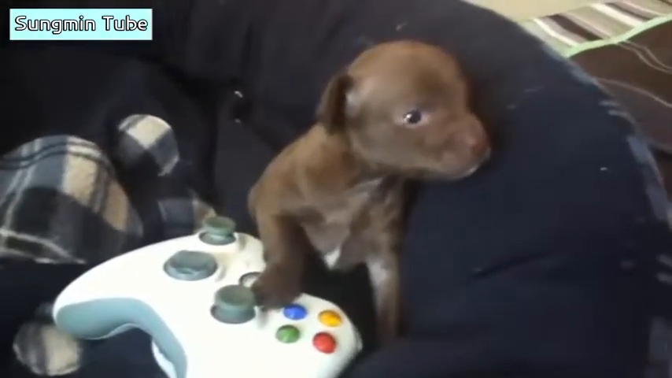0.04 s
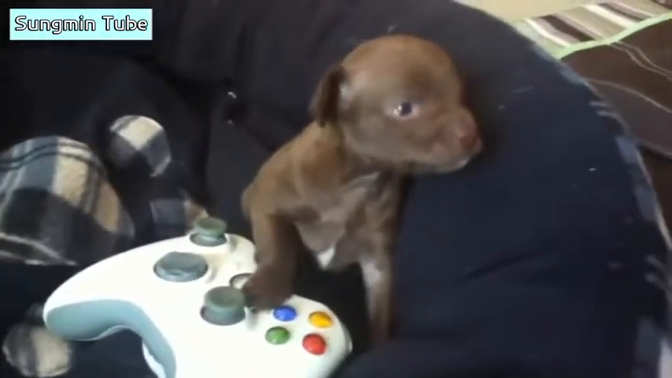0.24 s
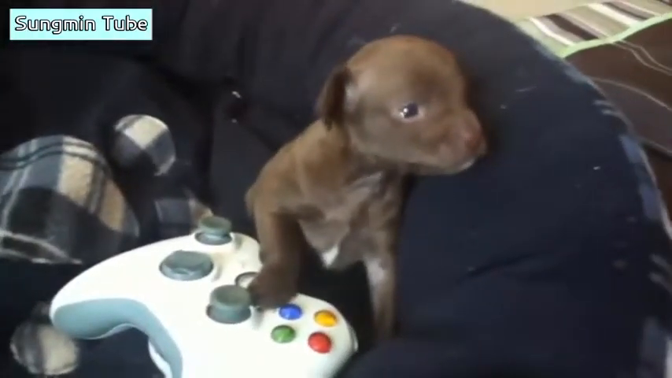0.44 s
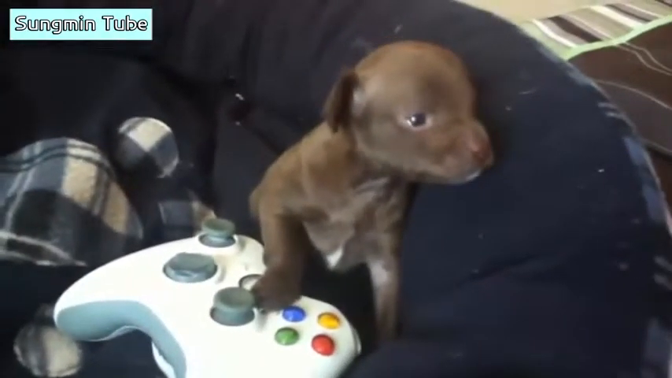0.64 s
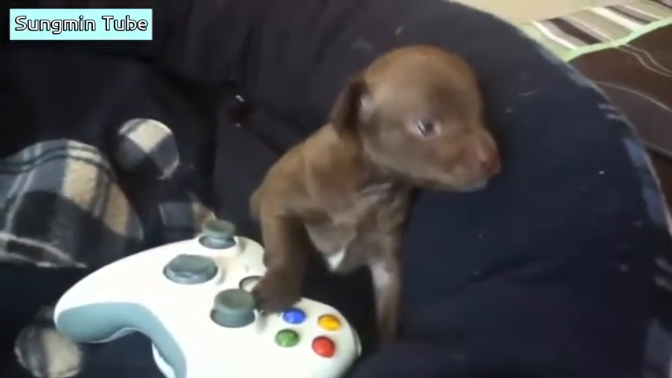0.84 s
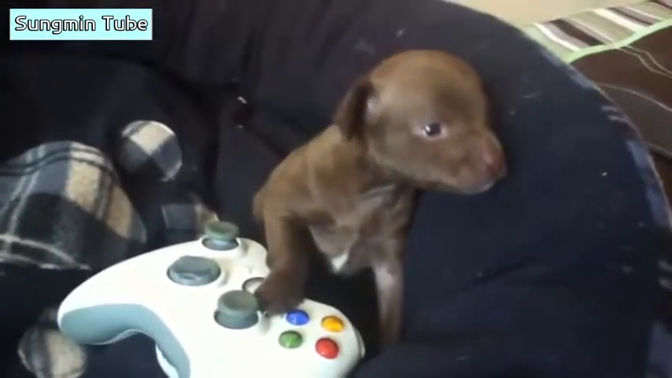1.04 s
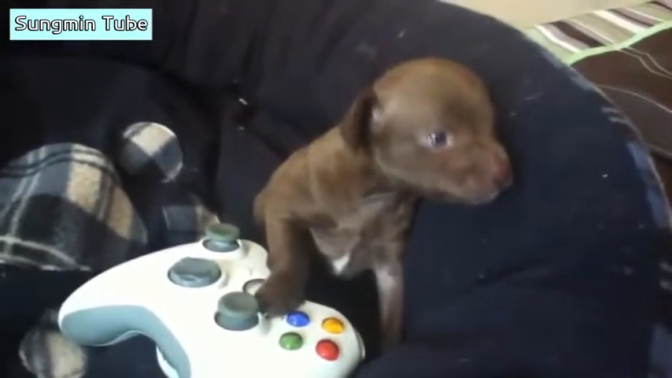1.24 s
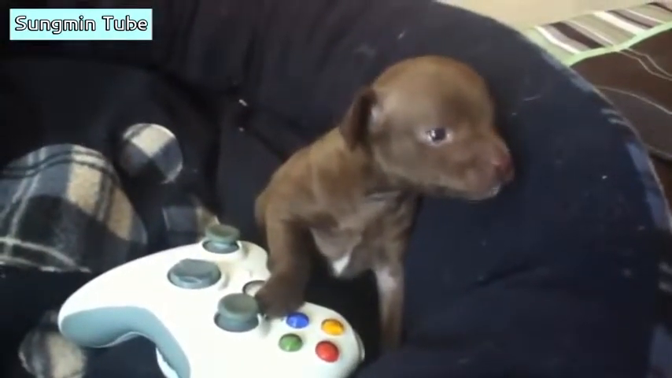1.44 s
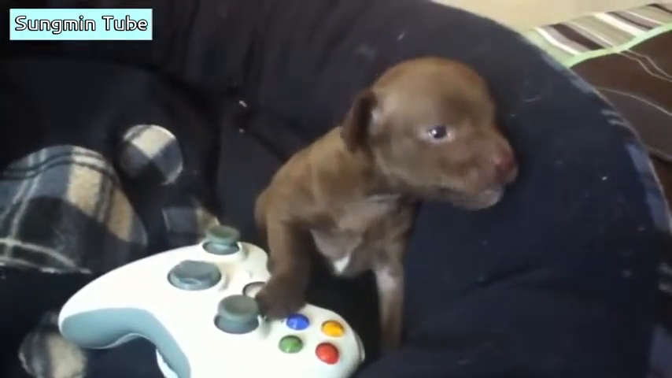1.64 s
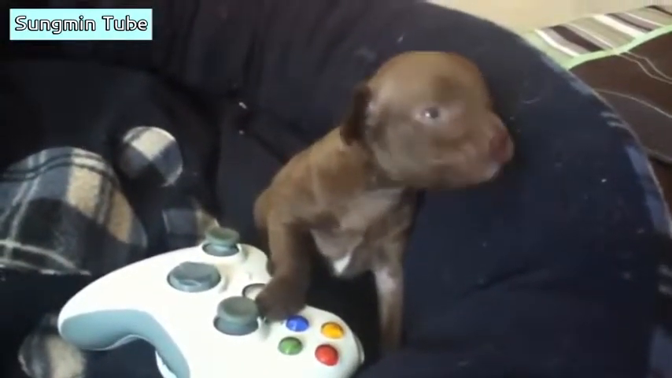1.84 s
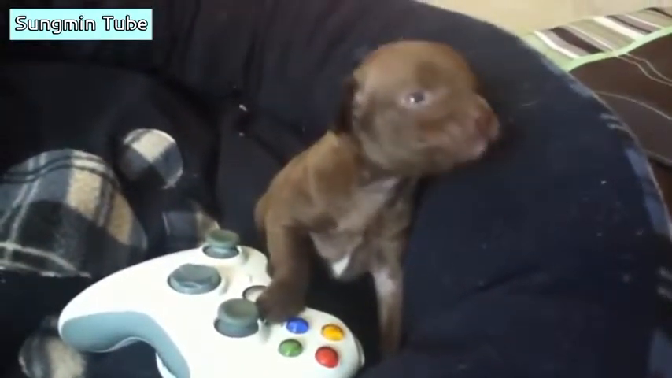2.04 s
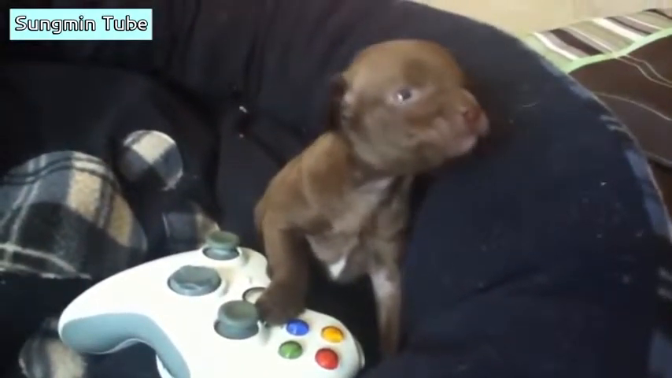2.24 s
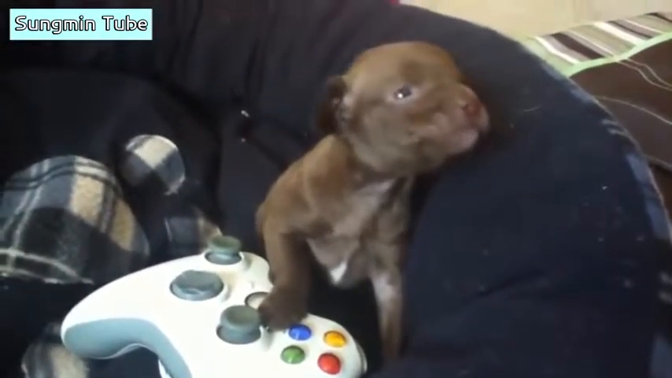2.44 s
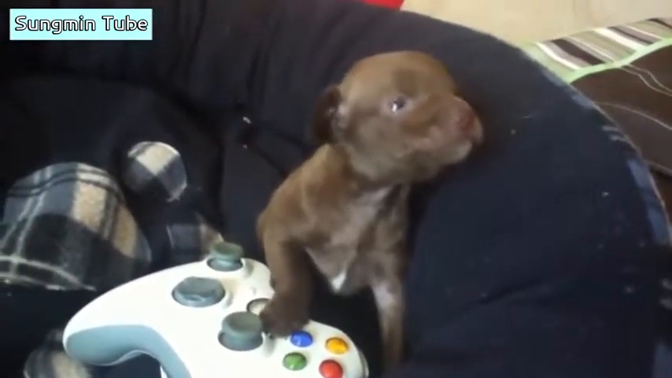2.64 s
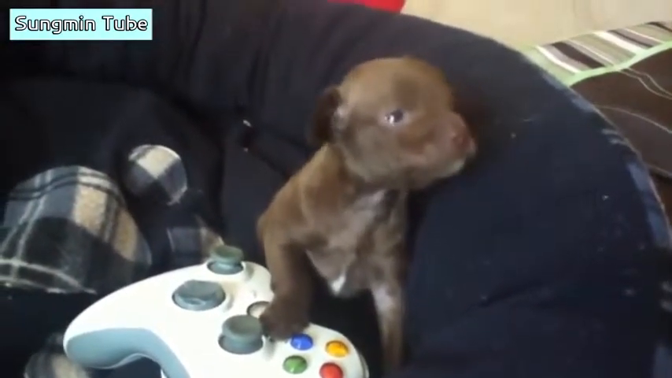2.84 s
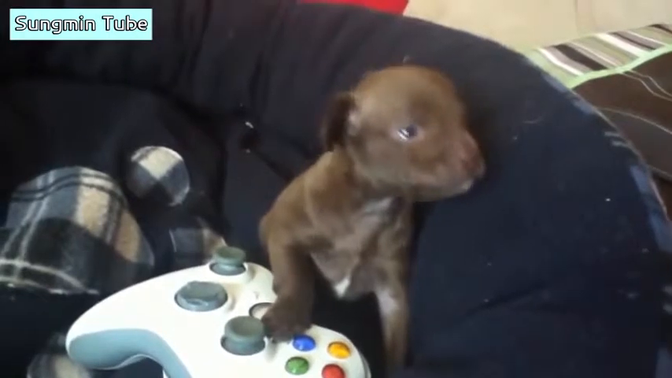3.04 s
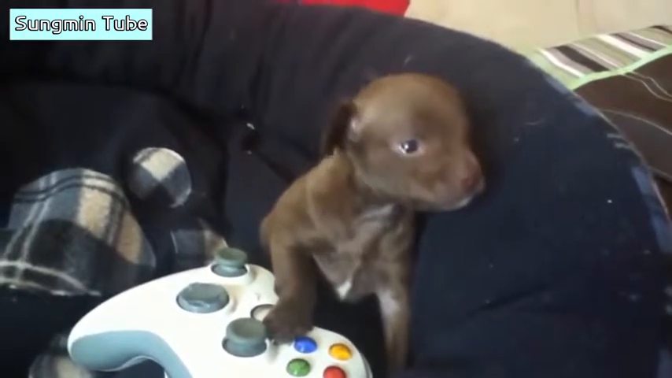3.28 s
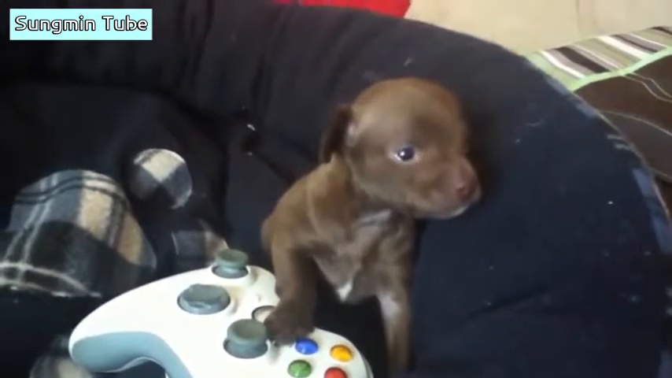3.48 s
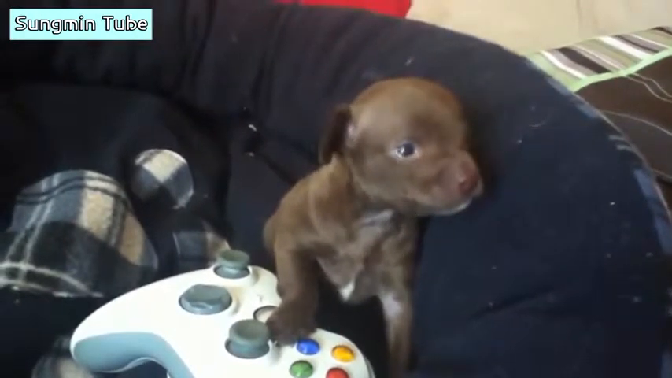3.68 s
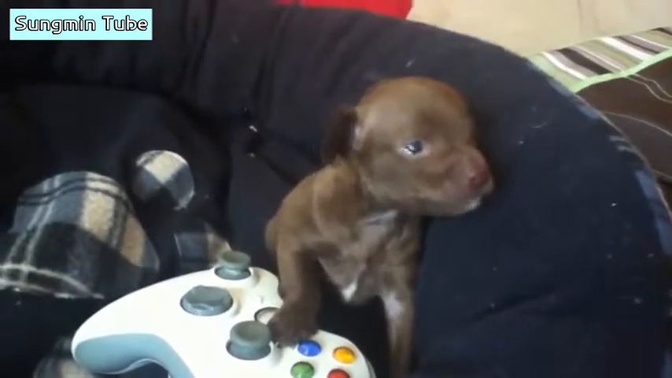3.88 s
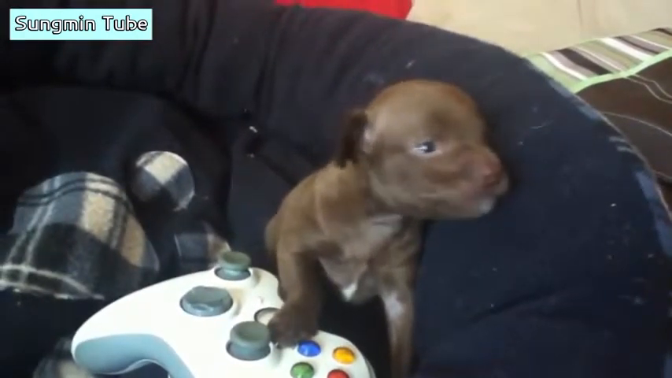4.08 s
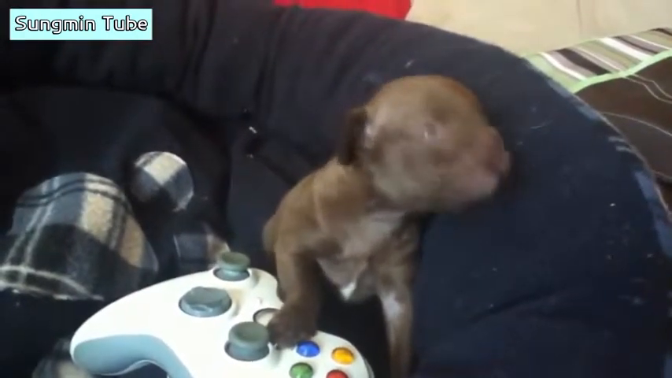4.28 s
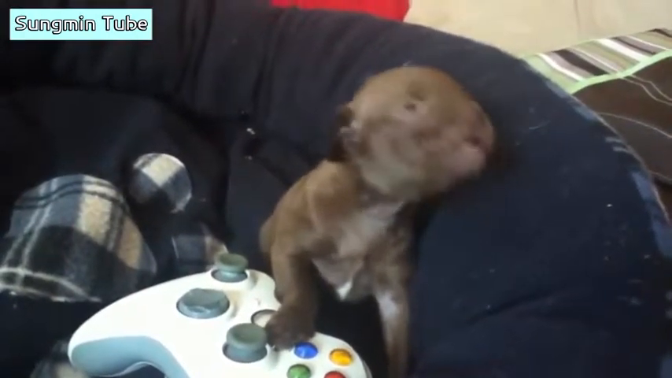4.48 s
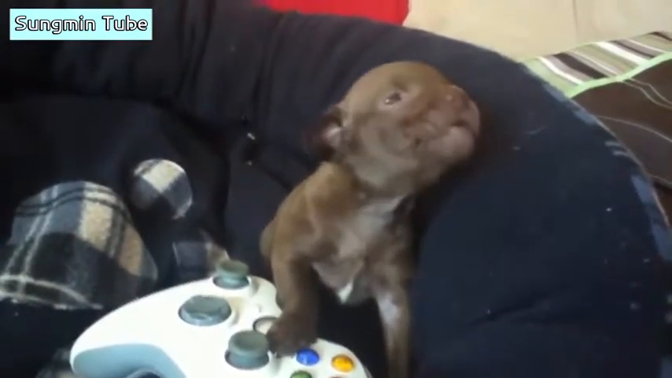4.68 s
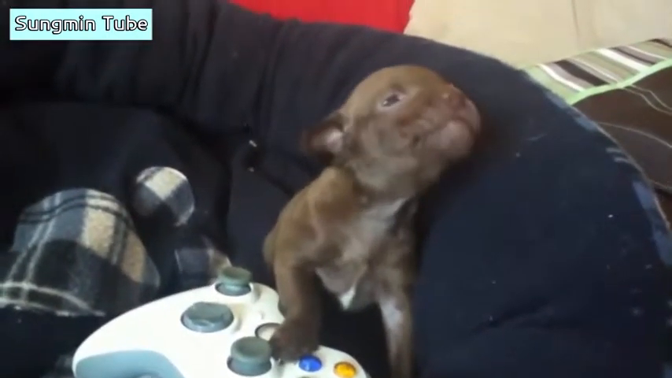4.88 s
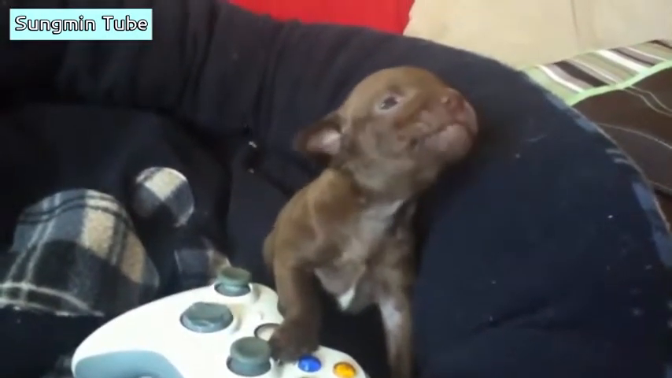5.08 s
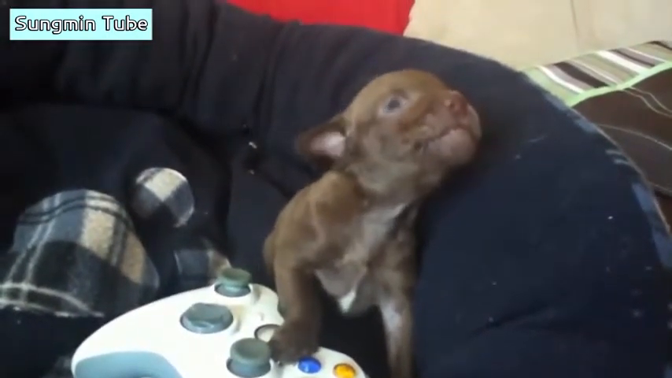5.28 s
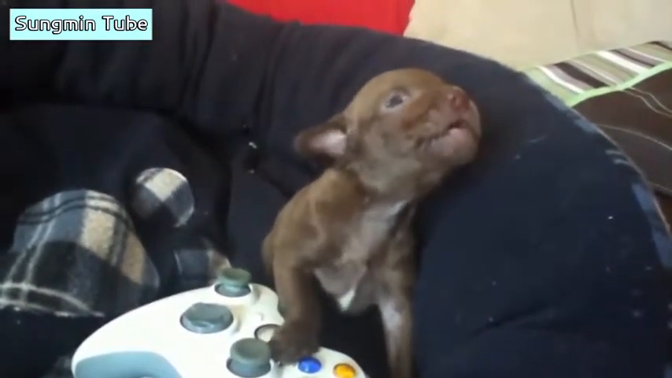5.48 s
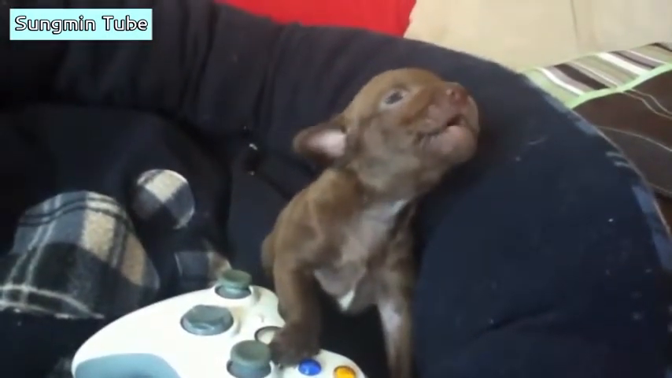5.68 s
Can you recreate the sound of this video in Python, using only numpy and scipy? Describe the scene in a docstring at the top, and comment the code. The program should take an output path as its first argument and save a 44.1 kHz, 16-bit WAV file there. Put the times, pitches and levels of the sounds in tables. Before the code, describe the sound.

A small puppy gives short whimpering grunts, one harsh yelp, then a high arching howl, close by in a quiet room.

```python
"""Puppy whimpering and howling

A small puppy, close by in a quiet room, whimpers in short closed-mouth grunts, gives one harsh yelp,
then a long arching howl and the start of another. Its vocal folds drive throat and mouth, and air
rushing through them adds rasp and hiss. The voice cracks at set moments, mostly near the flips
between its low chest register and its high head register."""
import sys
import numpy as np
from scipy import signal
from scipy.fft import rfft, irfft
from scipy.io import wavfile
from scipy.ndimage import uniform_filter1d, minimum_filter1d

SR = 44100
rng = np.random.default_rng(int(sys.argv[2]) if len(sys.argv) > 2 else 0)


def file_out(sig):
    """Save sig as 16-bit WAV at sys.argv[1]."""
    # one column per channel
    cols = np.atleast_2d(sig).T
    # limit, then scale
    lim = np.clip(cols, -1, 1)
    pcm = np.round(lim * 32767).astype(np.int16)
    wavfile.write(sys.argv[1], SR, pcm)


N = 252246
TIME = np.arange(N) / SR
SLACK_HZ, CUTOFF_HZ = 200, 15450  # pitch of slack folds; upper band edge


def vocal_folds(pitch_hz, head, rough, overtones_db, waver_db=2.0):
    """Folds drive the throat; with rising roughness their cycles alternate, then turn chaotic."""
    # throat gain on the overtones, per register: (frequency [Hz], gain [dB])
    chest_gains = [(600, -4.5), (900, -5.5), (1200, -13.5), (1450, -19), (1780, -24), (2080, -14),
                   (2350, -22.5), (2650, -37.5), (3200, -34.5), (4000, -46), (6300, -58), (8200, -55),
                   (10500, -64), (12800, -65)]
    head_gains = [(1400, -2.5), (1900, -9.5), (2400, -16.5), (2900, -30), (3450, -30), (3850, -42.5),
                  (4700, -38.5), (6400, -60), (7400, -43), (8100, -33), (10000, -38.5), (12000, -44.5),
                  (15000, -80)]
    size = len(pitch_hz)
    unevenness = 0.012 * (1 - head) + 0.113 * rough  # slack folds beat less evenly
    jitter = 0.0053 * flutter(53, size) + unevenness * flutter(600, size)
    phase = 2 * np.pi * np.cumsum(pitch_hz * (1 + jitter)) / SR
    overtones = np.zeros(size)
    for k in range(2, int(CUTOFF_HZ / pitch_hz.min())):
        hz = k * pitch_hz
        throat = gain_at(chest_gains, hz) ** (1 - head) * gain_at(head_gains, hz) ** head
        waver = from_db(waver_db * (1 - 2 / k) * flutter(42, size))
        overtones += throat * waver * (hz < CUTOFF_HZ) * np.cos(k * phase - np.sqrt(k - 1) * np.pi / 2)
    tone = np.cos(phase) + from_db(overtones_db) * overtones
    # alternating strong and weak cycles put lines between the lowest harmonics
    alternation = np.clip((rough - .12) / 0.46, 0, 1) * (1 - 0.73 * head)
    tone += alternation * (np.cos(1.5 * phase) + 0.54 * np.cos(2.5 * phase))
    shimmer = 1 + 0.49 * rough * flutter(270, size)
    clarity = 1 - 0.16 * rough ** 2
    return np.sqrt(2) * tone * shimmer * clarity, phase


def voice(pitch_hz, level_db, overtones_db, treble_db, rough, break_hz=690):
    """Fold tone and turbulent air, pulsed as the folds open, leave the mouth with a hiss."""
    # turbulence in throat and mouth; escaping air: (frequency [Hz], relative density [dB])
    rasp_spectrum = [(350, -62), (600, -25), (850, -4.5), (1250, -2.5), (1800, -7.5), (2500, -12),
                     (3000, -16), (3800, -23.5), (4700, -26), (6500, -45), (8000, -27), (10500, -77),
                     (13000, -41), (16000, -56)]
    hiss_spectrum = [(2500, -30), (4700, -4), (6600, -14), (8200, 2.5), (10500, -9), (13000, 4),
                     (14500, -19), (16000, -18)]
    size = len(pitch_hz)
    head = np.clip((pitch_hz - break_hz) / 140 + .5, 0, 1)  # register: 0 chest, 1 head
    tone, phase = vocal_folds(pitch_hz, head, rough, overtones_db)
    air = noise(lambda hz: gain_at(rasp_spectrum, hz), size) * (1 + 0.45 * np.cos(phase))
    leak = from_db(-38) + from_db(-27) * (1 - head)  # slack folds never close fully
    rasp = from_db(-3) * rough ** 1.56
    sound = tone + (leak + rasp) * air
    sound /= np.sqrt(uniform_filter1d(sound ** 2, size=600))  # unit rms: the push sets loudness
    hiss = from_db(-36.5) * (1 - 0.64 * head) * noise(lambda hz: gain_at(hiss_spectrum, hz), size)
    push = from_db(level_db)
    return mouth(push * sound, pitch_hz, treble_db) + push * hiss


def mouth(x, pitch_hz, treble_db):
    """Lips pass more or less treble and little bass; a gape on top notes adds a piercing resonance."""
    gape = np.clip((pitch_hz - 980) / 180, 0, 1)
    resonance = from_db(8) * signal.sosfilt(bandpass(centre_hz=3820, width_hz=560), gape * x)
    treble = signal.sosfiltfilt(signal.butter(6, 2850, "high", fs=SR, output="sos"), x)
    x = x + resonance + (from_db(treble_db) - 1) * treble
    return signal.sosfilt(signal.butter(3, 210, "high", fs=SR, output="sos"), x)


def call(on, pitch_hz, level_db, bloom_s=0.01, crack_edge_s=0.0059, edge_s=0.0025):
    """One call over the mask `on`: colour follows pitch; slack or cracking folds are rough."""
    # the mouth opens on higher notes: (pitch [Hz], overtone gain [dB], treble gain [dB])
    colours = [(288, -13, 3), (353, -4, -6), (505, -1, 0.5), (579, 5, -2), (650, 8.5, -2.5), (760, -3, -3),
               (840, 0.5, 0), (897, 1, -1), (940, 5, -4), (1170, 6.5, -10)]
    # voice cracks: (start [s], length [s], added roughness [0-1])
    cracks = [(1.414, 0.0049, 0.48), (1.616, .03, 0.25), (1.862, 0.0552, 0.73), (1.94, 0.0206, 0.71),
              (4.382, 0.015, 0.48), (4.446, 0.0597, 0.32), (5.075, 0.0092, 0.28)]
    t, out = TIME[on], np.zeros(N)
    knots_hz, *columns = np.transpose(colours)
    overtones_db, treble_db = [np.interp(pitch_hz, knots_hz, column) for column in columns]
    overtones_db -= 2 * np.exp(-(t - t[0]) / bloom_s)
    rough = 0.22 * (SLACK_HZ / pitch_hz) ** 2
    for start_s, length_s, depth in cracks:
        inside_s = np.minimum(t - start_s, start_s + length_s - t)
        rough += depth * np.clip(inside_s / crack_edge_s + .5, 0, 1)
    edge = np.clip(np.minimum(t - t[0], t[-1] - t) / edge_s, 0, 1)
    fade = np.sin(edge * np.pi / 2) ** 2
    out[on] = fade * voice(pitch_hz, level_db, overtones_db, treble_db, np.clip(rough, 0, 1))
    return out


def cry(contour):
    """A sustained call along a contour of pitch and level."""
    times_s, pitch_hz, level_db = np.transpose(contour)
    on = (TIME >= times_s[0]) & (TIME <= times_s[-1])
    return call(on, np.interp(TIME[on], times_s, pitch_hz), np.interp(TIME[on], times_s, level_db))


def howls():
    """A howl climbs into head register and arches, a treble band flaring twice; a second begins."""
    # voice contours: (time [s], pitch [Hz], level [dB])
    climb = [(4.289, 348, -26.5), (4.309, 408, -22.5), (4.341, 512, -16), (4.381, 597, -19),
             (4.391, 769, -16), (4.419, 796, -15.5), (4.435, 654, -19), (4.459, 592.4, -17.5),
             (4.487, 661, -17)]
    arch = [(4.5, 810, -15.5), (4.508, 805, -12.5), (4.518, 851, -13), (4.566, 902, -13),
            (4.614, 901, -12.5), (4.658, 960.6, -15), (4.744, 956, -15), (4.812, 938, -17.5),
            (4.844, 919, -14), (4.914, 860, -16), (4.936, 817, -16), (4.978, 804.6, -16.5),
            (5.034, 675.5, -22), (5.066, 675, -28.5), (5.078, 789, -27.5)]
    next_howl = [(5.587, 307, -29.5), (5.615, 354, -24), (5.668, 362, -23), (5.73, 485, -18)]
    # overtone flares: (crest [s], half length [s], gain of the added band [dB])
    flares = [(4.608, 0.012, 3), (4.915, 0.083, 6.5)]
    howl = cry(np.vstack([climb, arch]))
    band = signal.sosfiltfilt(bandpass(centre_hz=3300, width_hz=500), howl)
    flare = sum(from_db(db) * swell(crest_s, half_s) for crest_s, half_s, db in flares)
    return howl + flare * band + cry(next_howl)


def yelp():
    """A harsh leap in pitch with a gust of air at its front."""
    # voice contour: (time [s], pitch [Hz], level [dB])
    contour = [(1.798, 319.3, -28), (1.864, 746, -13), (1.87, 979, -12), (1.882, 1101, -13),
               (1.902, 1213, -9), (1.93, 1234, -6), (1.942, 1051, -10), (1.95, 1246, -8.5),
               (1.958, 1192, -8.5), (1.96, 1074, -9.5), (1.964, 658, -14.5), (1.982, 570, -15.5),
               (2.078, 468.6, -17), (2.098, 337, -28)]
    # expelled air: (frequency [Hz], relative density [dB])
    gust_spectrum = [(2500, -28), (4500, -1), (5700, -9), (6700, -19), (8000, 2), (10500, -10.5),
                     (13000, -7), (16000, -32)]
    air = noise(lambda hz: gain_at(gust_spectrum, hz), N)
    gust = from_db(-35.5) * swell(crest_s=1.883, half_s=0.025) * air
    return cry(contour) + gust


def whimpers(slide=.46, swell_db=7, fade_s=0.027, fade_db_per_s=2200):
    """Short pushes of air: pitch and level rise and sag in one arch, then the folds swing out."""
    # pushes: (start [s], length [s], top pitch [Hz], top level [dB], crest [share of length])
    pushes = [(0.202, 0.027, 346, -32, 0.21), (0.398, 0.021, 303, -29.5, 0.18),
              (0.855, 0.065, 308.4, -28, 0.347), (1.385, 0.04, 507.5, -20.5, 0.71),
              (1.575, 0.078, 435.6, -20.5, .72), (2.479, 0.018, 289, -35, 0.59),
              (2.688, 0.05, 297.6, -28, 0.66), (2.909, 0.023, 287, -27.5, 0.13),
              (3.521, 0.0235, 308, -33, .4), (3.734, 0.025, 320, -30.5, 0.43),
              (3.926, 0.031, 339.7, -28.5, 0.34), (4.087, 0.062, 372, -22.5, 0.34)]
    out = np.zeros(N)
    for start_s, length_s, top_hz, top_db, crest in pushes:
        crest_s, end_s = start_s + crest * length_s, start_s + length_s
        on = (TIME >= start_s) & (TIME <= end_s + fade_s)
        t = TIME[on]
        sag = np.interp(t, [start_s, crest_s, end_s], [-1, 0, 1]) ** 2
        pitch_hz = top_hz - slide * (top_hz - SLACK_HZ) * sag
        level_db = top_db - swell_db * sag - fade_db_per_s * np.maximum(t - end_s, 0)
        out += call(on, pitch_hz, level_db)
    return out


def room(x, t60_s=0.37, wet_db=-23, dull_hz=4500, gap_s=0.0054):
    """A small furnished room adds a faint, short, dull tail."""
    t = TIME[:SR // 2]
    decay = from_db(-60 * t / t60_s) * (t > gap_s)
    tail = decay * noise(lambda hz: 1 / np.hypot(1, hz / dull_hz), len(t))
    return x + from_db(wet_db) * signal.fftconvolve(x, tail / np.linalg.norm(tail))[:N]


def background(hum_hz=129.2, hiss_hz=1900):
    """Steady room noise with a wavering low hum and a faint midrange hiss."""
    # room noise: (frequency [Hz], relative density [dB])
    floor_spectrum = [(15, -65), (25, -22), (91, -6.5), (133, -2), (209, -8), (253, -0.5), (289, -6.5),
                      (482, -9.5), (826, -14.5), (919, -12), (1110, -13.5), (1850, -16), (2630, -21.5),
                      (3530, -22.5), (12000, -30), (15500, -36.5)]
    floor = from_db(-45) * noise(lambda hz: gain_at(floor_spectrum, hz), N)
    hum = from_db(-56) * noise(lambda hz: 1 / (1 + ((hz - hum_hz) / 9) ** 2), N)
    hiss = from_db(-62) * noise(lambda hz: 1 / (1 + ((hz - hiss_hz) / 220) ** 2), N)
    return floor + hum + hiss


def from_db(db):
    """Decibels to gain."""
    return 10 ** (np.asarray(db) / 20)


def gain_at(spectrum, hz):
    """Gain of a (Hz, dB) table, interpolated over log frequency."""
    knots_hz, db = np.transpose(spectrum)
    return from_db(np.interp(np.log(np.maximum(hz, 1)), np.log(knots_hz), db))


def noise(shape, size):
    """Unit-rms noise with amplitude spectrum shape(hz)."""
    hz = np.arange(size // 2 + 1) * SR / size
    x = irfft(rfft(rng.standard_normal(size)) * shape(hz), size)
    return x / np.std(x)


def flutter(rate_hz, size):
    """Unit-rms random wavering, rolled off above rate_hz."""
    return noise(lambda hz: (hz > 0) / (1 + (hz / rate_hz) ** 3), size)


def swell(crest_s, half_s):
    """Bell-shaped envelope of height 1."""
    return np.exp(-((TIME - crest_s) / half_s) ** 2)


def bandpass(centre_hz, width_hz):
    """Butterworth band-pass sections."""
    edges_hz = [centre_hz - width_hz / 2, centre_hz + width_hz / 2]
    return signal.butter(2, edges_hz, "band", fs=SR, output="sos")


def scene():
    """The puppy's calls in the room, mono."""
    puppy = howls() + yelp() + whimpers()
    return (room(puppy) + background())[None]


def record(dry, ceiling=.9):
    """Fast peak limiter, then a steep low-pass."""
    peak = -minimum_filter1d(-np.abs(dry), size=129)
    gain = uniform_filter1d(ceiling / np.maximum(peak, ceiling), size=129)
    return signal.sosfilt(signal.ellip(14, .1, 80, CUTOFF_HZ, fs=SR, output="sos"), gain * dry)


dry = scene()
out = record(dry)
file_out(out)
```